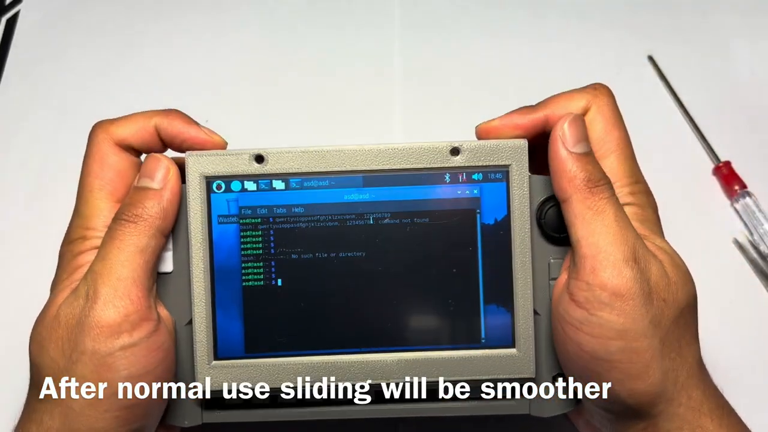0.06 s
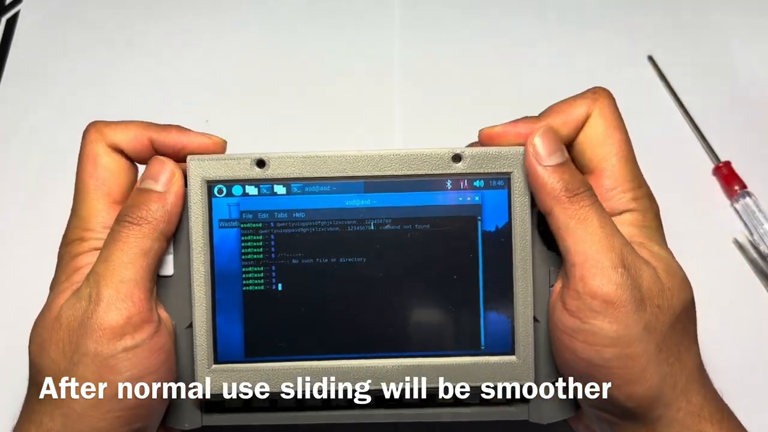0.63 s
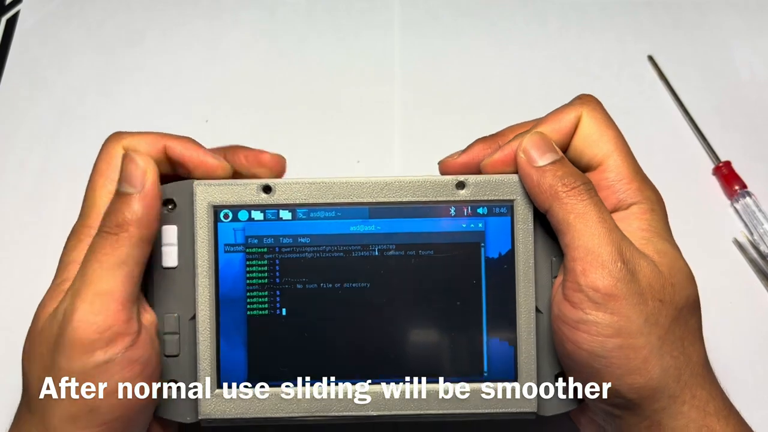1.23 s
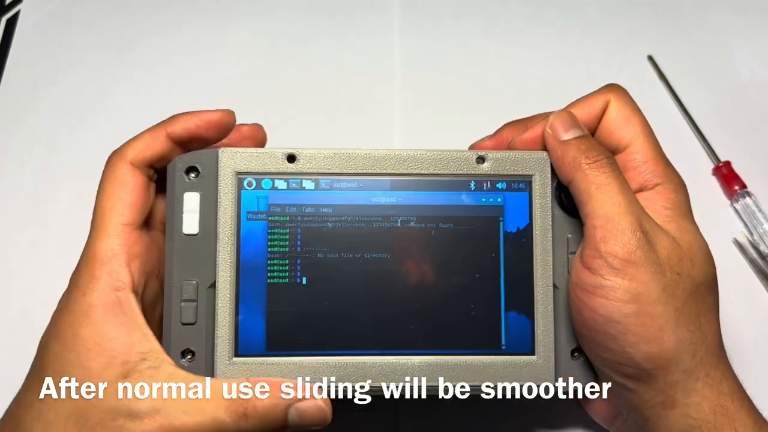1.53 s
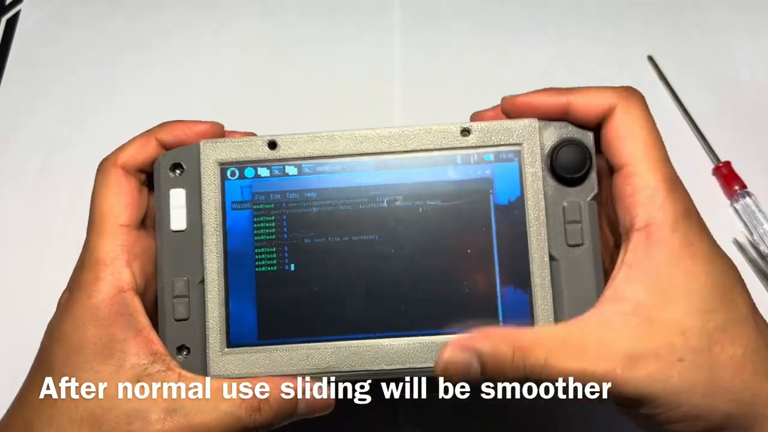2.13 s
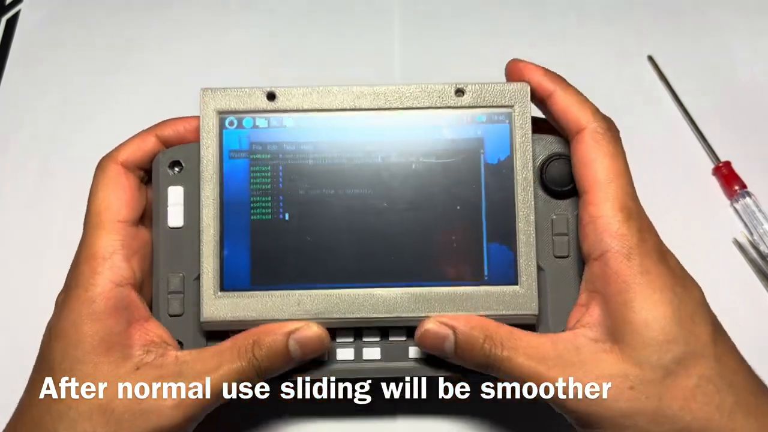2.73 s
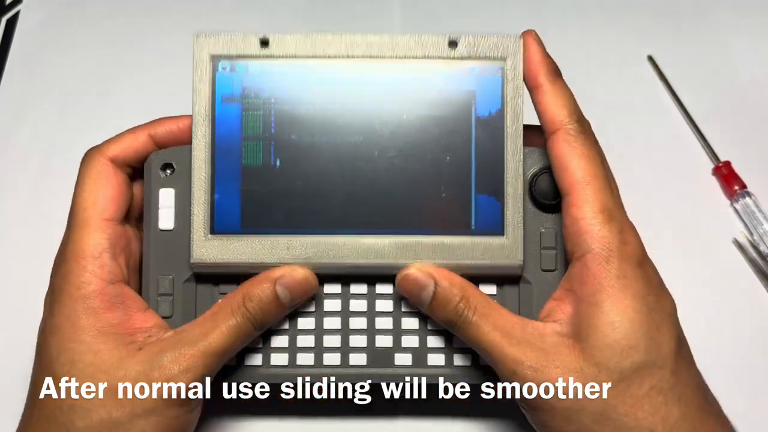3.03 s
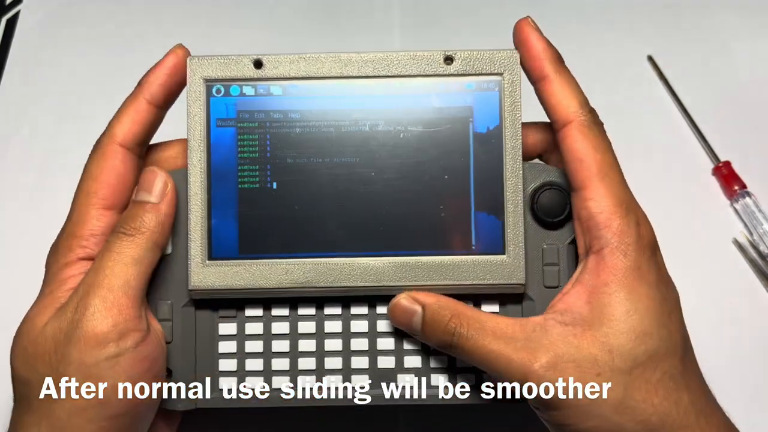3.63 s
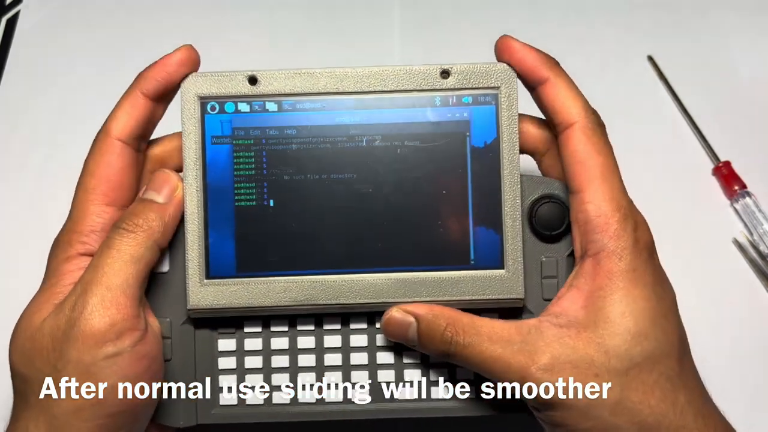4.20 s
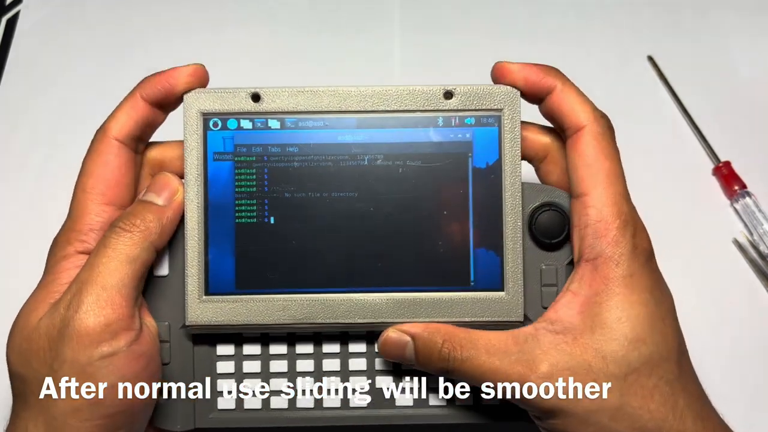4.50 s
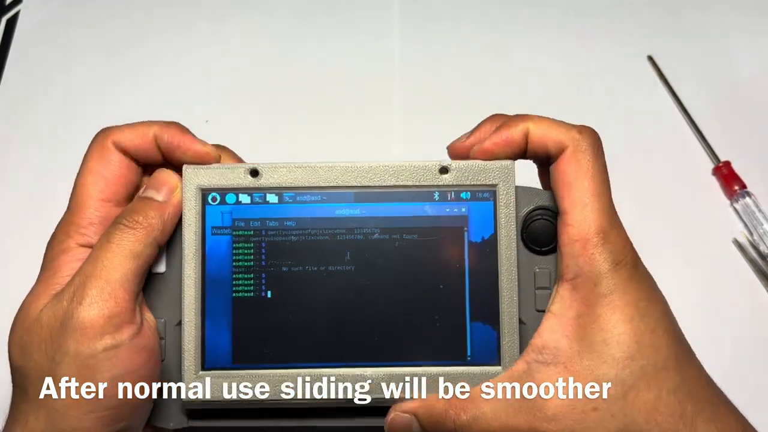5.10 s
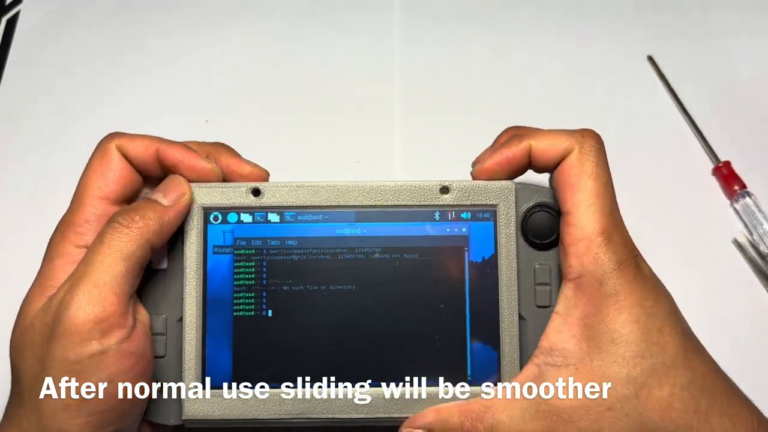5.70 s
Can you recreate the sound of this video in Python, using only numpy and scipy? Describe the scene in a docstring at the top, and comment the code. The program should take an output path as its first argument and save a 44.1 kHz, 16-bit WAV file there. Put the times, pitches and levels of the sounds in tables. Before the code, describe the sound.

Sharp hollow plastic clacks and short scraping rubs as a handheld device is slid shut, open and shut, close by indoors.

```python
"""The sliding screen of a plastic handheld computer, snapped shut, pushed open and pulled shut again.
It sticks and slips on its rails, rubs along them and clacks against catches and end stops; the hollow
case rings. Between strokes, fingers tap and brush on the case. It is held above a desk in a small quiet
room, close to the microphones and a little to the left, over soft room air and a faint hum."""
import sys
import numpy as np
from scipy import signal
from scipy.fft import rfft, irfft, next_fast_len
from scipy.io import wavfile

SR = 44100
rng = np.random.default_rng(int(sys.argv[2]) if len(sys.argv) > 2 else 0)


def file_out(sig):
    """Save sig as 16-bit WAV at sys.argv[1]."""
    # one column per channel
    cols = np.atleast_2d(sig).T
    # limit, then scale
    lim = np.clip(cols, -1, 1)
    pcm = np.round(lim * 32767).astype(np.int16)
    wavfile.write(sys.argv[1], SR, pcm)


N = 262395
TIME = np.arange(N) / SR
CONTACT_TIME = TIME[:6000]
FACES = 4   # sides of the case that each radiate their own share of the sound

# room air (frequency [Hz], gain [dB])
AIR_COLOUR = [(15, -37), (25, -14.5), (49, -4.5), (137, -1), (277, -4.5), (309, -3), (575, -8), (1040, -10),
              (1740, -15), (2840, -13.5), (3250, -19), (7710, -39.5), (10100, -42), (12200, -33),
              (16000, -48)]
# drift of the room air (time [s], level [dB])
AIR_DRIFT = [(0, -66), (.6, -69), (1.2, -64), (2.1, -70), (3.2, -62.5), (4.2, -66.5), (5.95, -65.5)]
# the case sways in the hands (time [s], level [dB])
CASE_SWAYS = [(2.36, -65), (3.699, -56), (3.8, -67.5), (4.049, -65), (4.31, -64.5)]
# room decay (frequency [Hz], time to fall 60 dB [s])
ROOM_DECAY = [(100, 0.29), (1000, 0.35), (4000, 0.32), (8000, 0.3), (14000, 0.29)]
# tone of the echoes (frequency [Hz], gain [dB])
ECHO_COLOUR = [(60, -8), (200, 3), (500, 2.5), (900, 0.5), (2500, 1), (5000, 4), (8000, 1.5), (11500, -3),
               (14500, -7), (16000, -15)]
# room sound at the two microphones (frequency [Hz], left-right likeness [0-1])
ROOM_COHERENCE = [(100, 0.7), (300, 1), (700, 0.2027), (2000, 0.22), (6000, 0.4), (13000, 0.19)]
# modes of the hollow case (frequency [Hz], bandwidth [Hz], relative level [dB])
CASE_MODES = [(466, 190, -3.5), (486, 33, -6), (598, 130, 1), (736, 230, 0.5), (909, 56, 1.5),
              (1020, 93, 5), (1197, 44, -5), (1313, 250, -1.5), (1556, 83, -5.5), (1840, 87, -10.5),
              (2390, 310, -14.5), (2359, 66, 3), (2600, 130, -6.5), (3086, 140, -0.5), (3344, 79, -10.5),
              (4520, 870, -8), (5076, 380, -13.5), (6370, 150, -14.5), (7744, 460, -16)]
# clacks on catches and end stops; the last three columns are relative to the level
# (time [s], level [dB], chatter fade [ms], main pitch [Hz], crack [dB], knock [dB], thud [dB])
STOP_CLACKS = [(0.7762, -19.5, 9.4, 1530, -6.5, -23, -26), (.791, -12.5, 2.8, 898, -8, -14.5, -21),
               (3.0815, -18, 5.5, 1710, -6.5, -11.5, -20.5), (4.7453, -35.5, 3.1, 1500, -16, -38, -32),
               (4.7505, -25, 8.2, 1290, -16, -33, -22.5), (4.9452, -22, 17.8, 1360, -5.5, -23.5, -16),
               (5.0036, -35.5, 1.6, 1260, 4.5, -32, -5.5), (5.3057, -31, 14, 1100, -20, -13.5, -35),
               (5.3169, -23, 5, 774, -12, -16, -14)]
# crack of the rails (frequency [Hz], gain [dB])
CRACK_COLOUR = [(1500, -29.5), (3000, -4.5), (5000, -0.5), (8000, -1), (11000, -3), (13500, -2.5),
                (16000, -14)]
# short slips along the rails (time [s], level [dB], fade [ms], main pitch [Hz])
RAIL_SLIPS = [(.7844, -24, 5.1, 2420), (2.53, -27.5, 9.4, 650), (2.6486, -39, 3.4, 2850),
              (2.652, -35, 12.7, 1030), (2.688, -40.5, 10.8, 1280), (2.787, -52, 9.5, 1040),
              (2.858, -48.5, 3.5, 2510), (2.901, -51.5, 6.3, 900), (3.4568, -43, 3.3, 1058),
              (4.4705, -31, 12, 1164), (4.508, -47.5, 6, 2600), (4.598, -42, 5.1, 1206),
              (4.603, -32.5, 9.2, 1170), (4.640, -45.5, 8.9, 1670), (5.103, -48.5, 5, 1350),
              (5.132, -46, 15, 980), (5.227, -53.5, 4.2, 1325), (5.264, -53.5, 2.7, 1186),
              (5.284, -42.5, 20, 890)]
# fingers tap and the case creaks under them (time [s], level [dB], pitch [Hz])
FINGER_TAPS = [(1.142, -67.5, 2900), (1.36, -58, 1102), (1.376, -64, 1900), (1.443, -60.5, 860),
               (1.534, -57.5, 507), (2.253, -59.5, 1585), (3.19, -53, 540), (3.258, -55, 807),
               (3.270, -56.5, 1450), (3.5128, -39, 854), (3.5412, -51.5, 2840), (3.606, -45, 754),
               (3.7203, -50.5, 2460), (3.817, -58.5, 2330), (3.869, -60, 2560), (4.311, -62, 1170),
               (4.736, -54.5, 2140), (5.677, -68, 3200), (5.717, -58.5, 1247)]
# tick of nails and seams (frequency [Hz], gain [dB])
TICK_COLOUR = [(1500, -20), (3500, -6), (5200, 2), (7500, -2), (10000, -15), (13000, -16), (16000, -22)]
# skin brushes over the case (time [s], relative peak level [dB])
SKIN_STROKES = [(1.25, -62.5), (1.36, -69), (1.452, -74), (1.534, -79)]
# hiss of skin on plastic (frequency [Hz], gain [dB])
SKIN_COLOUR = [(1500, -7.5), (4000, 4), (7000, -4), (13000, -2.5), (16000, -17)]
# the grip changes (start [s], end [s])
GRIP_CHANGES = [(2.351, 2.5), (3.98, 4.4)]
# pushes drag the screen along its rails (time [s], length [s], relative peak level [dB])
RAIL_PUSHES = [(2.745, .19, -46), (2.928, .085, -45.5), (3.027, 0.076, -45.5), (5.085, .125, -48)]
# rasp of the rails (frequency [Hz], gain [dB])
RUB_COLOUR = [(200, -25), (500, 6), (1300, 6.5), (2200, 0), (3500, -18), (5000, -19), (8000, -12),
              (13000, -11), (16000, -29.5)]
# direct sound at the two microphones (frequency [Hz], left-right likeness [0-1])
DIRECT_COHERENCE = [(200, .99), (800, .93), (2000, .83), (6000, .85), (9000, .7), (13000, .45)]
# balance of the direct sound (frequency [Hz], left over right [dB])
DIRECT_BALANCE = [(100, -2), (700, 2.5), (1500, 4), (4000, 1.5), (8000, 0.5)]
# response of the microphone ports (frequency [Hz], gain [dB])
MIC_PORTS = [(8300, 0.5), (9300, -1.5), (10100, -19), (11000, -3.5), (12000, -2.5)]


def from_db(db):
    """Decibels to gain."""
    return 10 ** (np.asarray(db) / 20)


def rms_one(x):
    """Scale to rms 1."""
    return x / np.sqrt(np.mean(x ** 2) + 1e-20)


def burst(x):
    """Scale to the energy of 10 ms at rms 1."""
    return x * np.sqrt(.01 * SR / (np.sum(x ** 2, axis=-1, keepdims=True) + 1e-20))


def at_hz(points, hz):
    """Read a table on a log-frequency axis."""
    table_hz, value = np.transpose(points)
    return np.interp(np.log(np.maximum(hz, 1)), np.log(table_hz), value)


def colour(x, points):
    """Causal (minimum-phase) filter through points of (frequency [Hz], gain [dB])."""
    size = next_fast_len(x.shape[-1] // 2 + 2048, True) * 2
    gain = from_db(at_hz(points, np.fft.rfftfreq(size, 1 / SR)))
    cepstrum = irfft(np.log(gain))
    cepstrum[1:size // 2] *= 2
    cepstrum[size // 2 + 1:] = 0
    return irfft(rfft(x, size) * np.exp(rfft(cepstrum)))[..., :x.shape[-1]]


def widen(signals, coherence):
    """The first two signals become mid and side of a stereo pair, as alike as the table says."""
    alike = [(hz, np.clip(c, 0, .995)) for hz, c in coherence]
    side = colour(signals[1], [(hz, 10 * np.log10((1 - c) / (1 + c))) for hz, c in alike])
    return np.array([signals[0] + side, signals[0] - side])


def resonate(x, hz, width_hz):
    """A resonance with gain 1 at its top."""
    r = np.exp(-np.pi * width_hz / SR)
    poles = [1, -2 * r * np.cos(2 * np.pi * hz / SR), r * r]
    return signal.lfilter(np.array([1, 0, -1]) * (1 - r * r) / 2, poles, x + 1e-18)


def add(out, start_s, sound):
    """Mix a sound in at a given time."""
    start = int(round(start_s * SR))
    out[:, start:start + sound.shape[-1]] += sound[:, :N - start]


def grains(count, per_s, spread_db):
    """Tiny contacts of uneven size, one train for each face of the case."""
    shape = (FACES, count)
    sizes = from_db(spread_db * np.minimum(rng.exponential(1, shape), 3)) * rng.choice([-1, 1], shape)
    return sizes * (rng.random(shape) < per_s / SR)


def chatter(swell_ms, fade_ms, per_s):
    """Surfaces meet in a flurry of contacts that swells and dies."""
    ms = CONTACT_TIME * 1000
    envelope = (1 - np.exp(-ms / swell_ms)) ** 2 * np.exp(-ms / fade_ms)
    return grains(len(ms), per_s, spread_db=4) * envelope


def background(rumble_db=-77, sway_s=.035, hum_hz=94, hum_db=-77):
    """Room air, a faint hum and the low sway of the case in the hands."""
    air = rms_one(widen(colour(rng.standard_normal((2, N)), AIR_COLOUR), ROOM_COHERENCE))
    air_gain = from_db(np.interp(TIME, *np.transpose(AIR_DRIFT)))
    rumble = rms_one(resonate(resonate(rng.standard_normal(N), 55, 22), 35, 23))
    sway = sum(from_db(db) * np.exp(-((TIME - s) / sway_s) ** 2) for s, db in CASE_SWAYS)
    hum = from_db(hum_db) * np.sin(2 * np.pi * hum_hz * TIME)
    return air_gain * air + (from_db(rumble_db) + sway) * rumble + hum


def room(faces, early_db=-13, early_t60_s=.027, late_db=-14, build_s=.0065):
    """Each face sends dense echoes off the desk and near walls, then a tail that dies band by band."""
    t = TIME[:SR * 5 // 8]
    edges_hz = np.geomspace(40, 19000, 13)
    white = rng.standard_normal((2, 2, FACES, len(t)))
    late = 0
    for k, (low, high) in enumerate(zip(edges_hz, edges_hz[1:])):
        band = signal.sosfilt(signal.butter(2, [low, high], "band", fs=SR, output="sos"), white[k % 2])
        late = late + band * from_db(-60 * t / at_hz(ROOM_DECAY, np.sqrt(low * high)))
    early = rng.standard_normal((2, FACES, len(t))) * from_db(-60 * t / early_t60_s)
    build = 1 - np.exp(-(t / build_s) ** 2)
    echoes = from_db(early_db) * rms_one(early * build) + from_db(late_db) * rms_one(late * build)
    response = colour(widen(echoes, ROOM_COHERENCE), ECHO_COLOUR) / np.sqrt(2 * FACES * len(t))
    return signal.oaconvolve(faces[None], response, axes=2).sum(axis=1)[:, :N]


def case_ring(force, main_hz, favour_db=7, scatter_db=5.5, broad_db=-15):
    """The case rings; the place of contact favours the modes near one pitch."""
    out = from_db(broad_db) * resonate(resonate(force, main_hz, 1.9 * main_hz), 1800, 4600)
    for k, (hz, width_hz, db) in enumerate(CASE_MODES):
        nearness = np.exp(-np.log2(hz / main_hz) ** 2)
        strength = from_db(db + favour_db * (nearness - 3) + rng.normal(0, scatter_db, (FACES, 1)))
        mode = resonate(force, hz, max(width_hz, hz / 60))   # plastic never rings long
        out = out + (-1) ** k * strength * mode
    return out


def dying_echo(clack_db=-23, crack_db=-3, age_s=.012):
    """At the start, the room still rings from a clack just before."""
    out = np.zeros((2, N))
    force = chatter(swell_ms=.66, fade_ms=.46, per_s=16000)
    ring = burst(case_ring(force, main_hz=1740))
    crack = from_db(crack_db) * burst(colour(force, CRACK_COLOUR))
    add(out, 0, from_db(clack_db) * room(ring + crack)[:, int(age_s * SR):])
    return out


def clacks(knock_hz=268, thud_hz=100, thud_lag_s=.006, damped_db=-1, crack_fade_share=.71):
    """The screen hits a stop: the rails crack, the walls ring and the whole body knocks and thuds."""
    out = np.zeros((FACES, N))
    impulse = (CONTACT_TIME == 0) * 1.
    knock = burst(resonate(resonate(impulse, knock_hz, 90), knock_hz, 600))
    thud = burst(resonate(resonate(impulse, thud_hz, 40), 89, 59))
    # the heavy body takes a moment to get moving
    thud = np.interp(CONTACT_TIME - thud_lag_s, CONTACT_TIME, thud, left=0)
    for s, db, fade_ms, hz, crack_db, knock_db, thud_db in STOP_CLACKS:
        force = chatter(.35, fade_ms, per_s=14000)
        # the wall around the contact gives a short, heavily damped note
        damped = burst(resonate(resonate(force, hz, .63 * hz), hz, 1.1 * hz))
        walls = burst(burst(case_ring(force, hz)) + from_db(damped_db) * damped)
        # only the first, hardest contacts reach the treble
        hard_force = chatter(.57, crack_fade_share * fade_ms, per_s=13000)
        crack = from_db(crack_db) * burst(colour(hard_force, CRACK_COLOUR))
        body = from_db(knock_db) * knock + from_db(thud_db) * thud
        add(out, s, from_db(db) * (walls + crack + body))
    return out


def slips(swell_share=.27, thud_db=-26, body_db=-17, crack_db_at_1khz=-10.5, crack_db_per_octave=4.5):
    """The screen breaks loose and rasps a few millimetres on; higher slips crack more."""
    out = np.zeros((FACES, N))
    for s, db, fade_ms, hz in RAIL_SLIPS:
        force = chatter(swell_share * fade_ms, fade_ms, per_s=6000)
        crack_db = crack_db_at_1khz + crack_db_per_octave * np.log2(hz / 1000)
        crack = from_db(crack_db) * burst(colour(force, CRACK_COLOUR))
        thud = from_db(thud_db) * burst(resonate(resonate(force, 85, 60), 54, 80))
        body = from_db(body_db) * burst(resonate(resonate(force, 480, 160), 580, 300))
        walls = burst(case_ring(force, hz, favour_db=8.5, broad_db=-16))
        add(out, s, from_db(db) * (walls + crack + body + thud))
    return out


def taps(ring_db=-10, fade_ms_at_1khz=5.8, shortening=.76, tick_db_at_1khz=-17.5, tick_db_per_octave=12.5):
    """A finger damps the case to one dull note; nails and seams add a tick."""
    out = np.zeros((FACES, N))
    for s, db, hz in FINGER_TAPS + faint_touches():
        # a harder touch is higher, shorter and ticks more
        octaves = np.log2(hz / 1000)
        force = chatter(.36, fade_ms_at_1khz / 2 ** (shortening * octaves), per_s=9900)
        note = burst(resonate(resonate(force, hz, hz / np.pi), hz, hz))
        ring = from_db(ring_db) * burst(case_ring(force, hz))
        tick_db = tick_db_at_1khz + tick_db_per_octave * octaves
        tick = from_db(tick_db) * burst(colour(force, TICK_COLOUR))
        add(out, s, from_db(db) * (burst(note + ring) + tick))
    return out


def brushes(gain_db=-2, rise_db_per_s=600.5, fall_db_per_s=203):
    """Skin brushes over the case: each stroke comes quickly and trails off."""
    envelope = sum(from_db(db + np.minimum(rise_db_per_s * (TIME - s), fall_db_per_s * (s - TIME)))
                   for s, db in SKIN_STROKES)
    hiss = rms_one(colour(rng.standard_normal((FACES, N)), SKIN_COLOUR))
    return from_db(gain_db) * envelope * hiss


def faint_touches(per_s=10, db=-61.5, hz=876):
    """Fingertips land softly at random as the grip changes: rows (time [s], level [dB], pitch [Hz])."""
    rows = []
    for start, end in GRIP_CHANGES:
        for when, force, hardness in rng.random((round((end - start) * per_s), 3)):
            rows.append((start + when * (end - start), db + 6 * (force - .5), hz * 2 ** (hardness - .5)))
    return rows


def rubs(gain_db=-2, ring_db=-4, rise_share=.64, speed_power=1.1):
    """Rough plastic drags along the rails, louder as each push gathers speed, softer as it slows."""
    out = np.zeros((FACES, N))
    for s, length_s, db in RAIL_PUSHES:
        speed = np.interp(np.linspace(0, 1, int(length_s * SR)), [0, rise_share, 1], [0, 1, 0])
        force = grains(len(speed), per_s=3500, spread_db=5)
        rasp = rms_one(colour(force, RUB_COLOUR))
        ring = from_db(ring_db) * rms_one(case_ring(force, main_hz=2500))
        add(out, s, from_db(gain_db + db) * speed ** speed_power * rms_one(rasp + ring))
    return out


def scene():
    """The device is close to the microphones and a little to the left, with the small room around it."""
    faces = clacks() + slips() + taps() + rubs() + brushes()
    left, right = widen(faces, DIRECT_COHERENCE)
    left = colour(left, [(hz, db / 2) for hz, db in DIRECT_BALANCE])
    right = colour(right, [(hz, -db / 2) for hz, db in DIRECT_BALANCE])
    return np.array([left, right]) + room(faces) + dying_echo() + background()


def record(dry, lag_from_hz=45, phase_turn_hz=9500, ceiling=.85, cutoff_hz=16300):
    """The microphone ports cut a treble notch; the loudest peaks are softly rounded and the recorder cuts the
    top."""
    # all-pass stages: the recorder delays lows more than highs
    for hz in np.geomspace(lag_from_hz, 3000, num=12):
        r = np.exp(-2 * np.pi * hz / SR)
        dry = signal.lfilter([-r, 1], [1, -r], dry)
    left, right = colour(dry, MIC_PORTS)
    # the ports also turn the phase of the left side
    poles = signal.iirnotch(phase_turn_hz, Q=6, fs=SR)[1]
    left = signal.lfilter(poles[::-1], poles, left)
    rounded = ceiling * np.tanh(np.array([left, right]) / ceiling)
    return signal.sosfilt(signal.ellip(10, .2, 80, cutoff_hz, fs=SR, output="sos"), rounded)


dry = scene()
out = record(dry)
file_out(out)
```